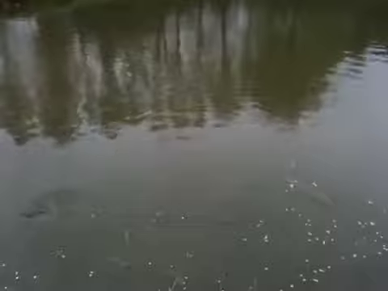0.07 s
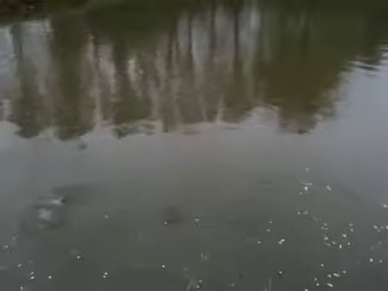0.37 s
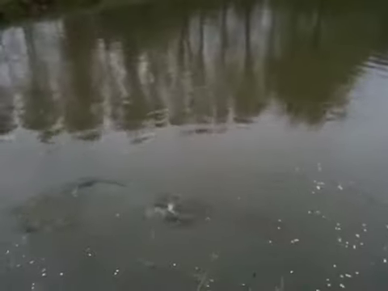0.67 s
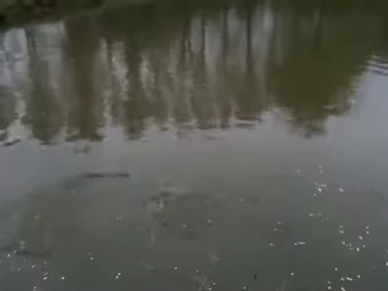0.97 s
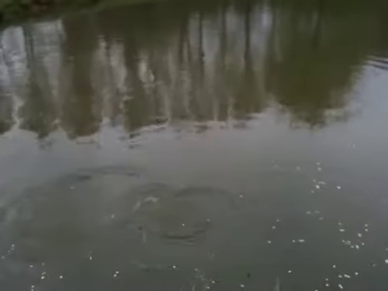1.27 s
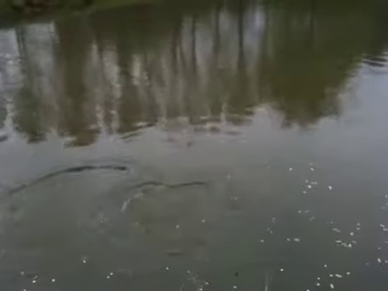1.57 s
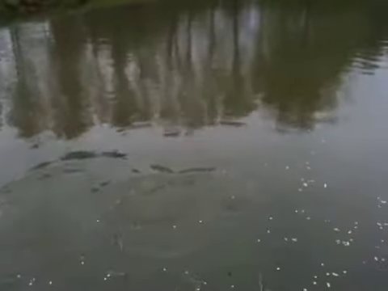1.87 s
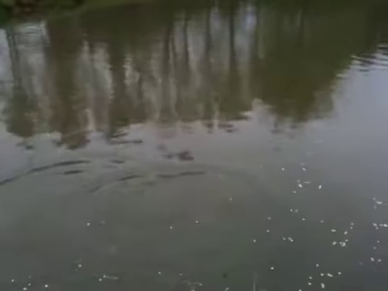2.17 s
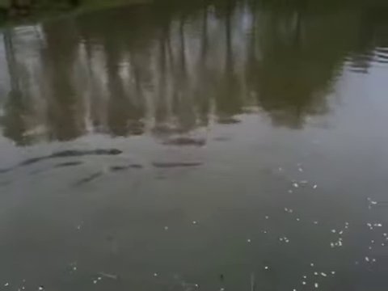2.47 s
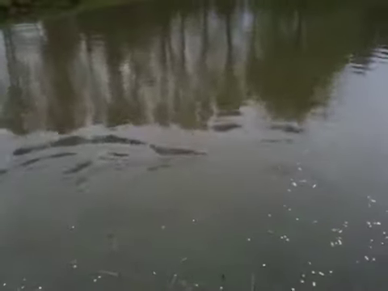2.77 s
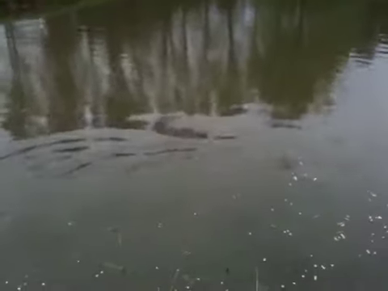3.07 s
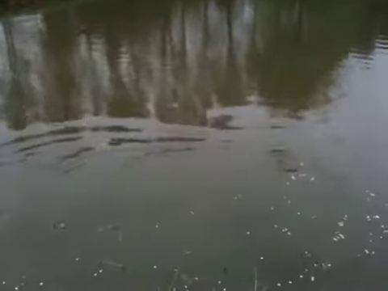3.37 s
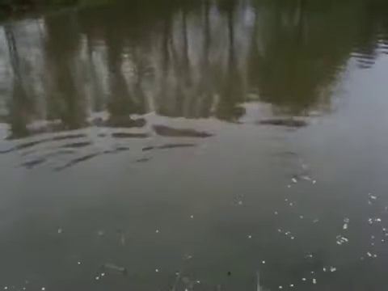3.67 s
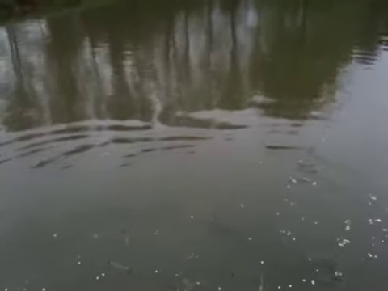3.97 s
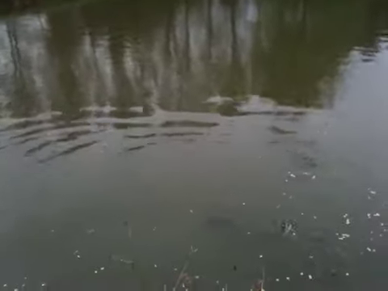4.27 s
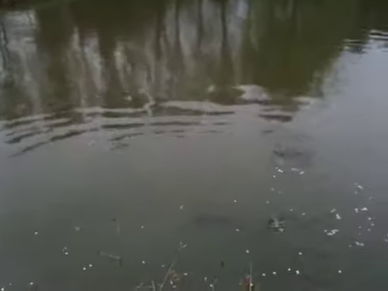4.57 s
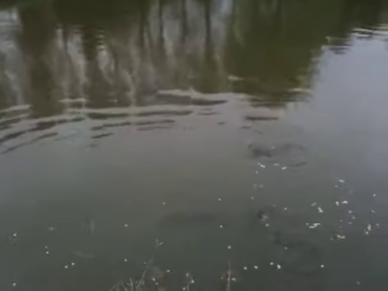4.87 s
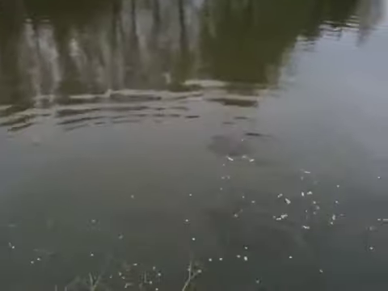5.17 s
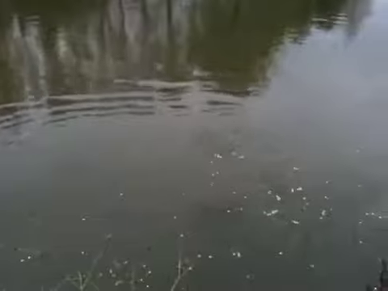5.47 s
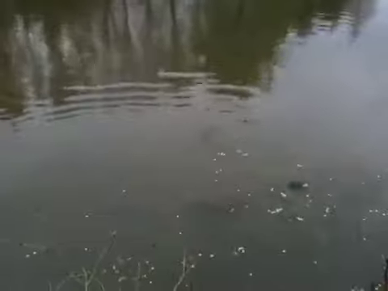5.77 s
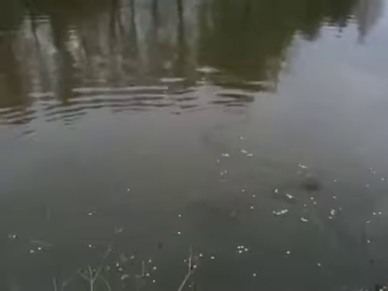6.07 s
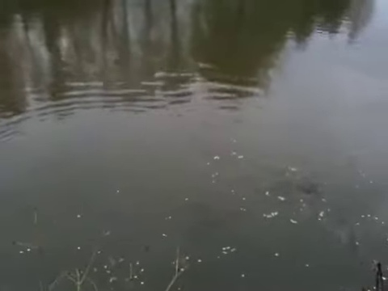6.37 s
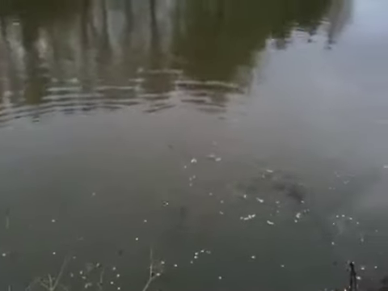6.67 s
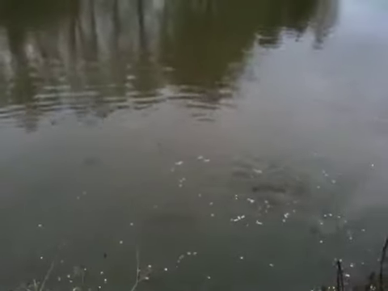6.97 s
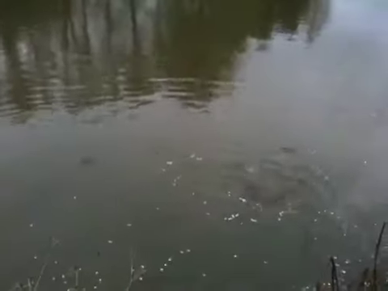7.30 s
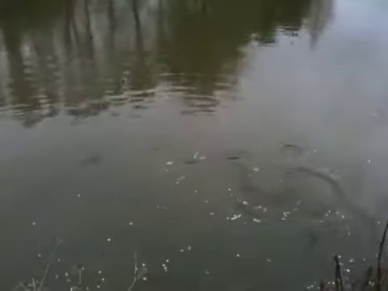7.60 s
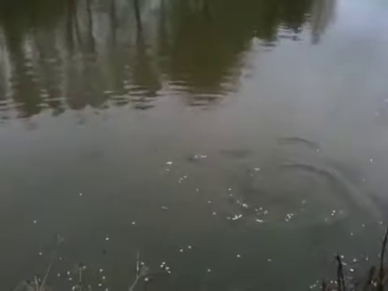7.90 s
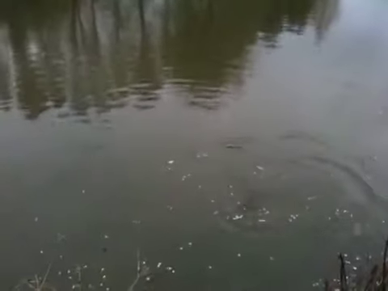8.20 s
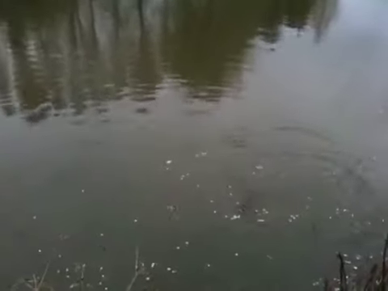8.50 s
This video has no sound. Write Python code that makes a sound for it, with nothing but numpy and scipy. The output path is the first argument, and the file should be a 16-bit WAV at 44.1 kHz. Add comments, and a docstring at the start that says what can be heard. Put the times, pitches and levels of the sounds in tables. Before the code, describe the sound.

Close by, fish break the surface of a pond with a few soft splashes and falling drops. At the same time, gusts of wind thump and rumble on the microphone, louder than anything else, then die down to a light breeze. Lone plips and ticks of water follow now and then. Across the pond, faint songbirds repeat short chirps and warbles over a quiet outdoor hush.

```python
"""Fish rising at a breezy pond

Close by, fish break the surface: soft splashes and falling drops, then lone plips and ticks.
Gusts thump right on the microphone and die down to a breeze.
Across the water songbirds repeat a few phrases, scattered by the trees, over a faint outdoor hush."""
import sys
import numpy as np
from scipy import signal
from scipy.fft import rfft, irfft, next_fast_len
from scipy.io import wavfile
from scipy.ndimage import uniform_filter1d

SR = 44100
rng = np.random.default_rng(int(sys.argv[2]) if len(sys.argv) > 2 else 0)


def int16_out(signal):
    """Quantize to a 16-bit WAV file."""
    q = np.round(np.clip(np.atleast_2d(signal).T, -1, 1) * 32767)
    wavfile.write(sys.argv[1], SR, q.astype(np.int16))


N = 376613
TIME = np.arange(N) / SR


# fish throwing up spray near the microphone: (time [s], relative level [dB], hold [s])
SPLASHES = [(0.18, -71, 0.19), (0.362, -67.5, 0.23), (0.665, -65.5, .02)]
# colour of droplets landing on water: (frequency [Hz], relative level [dB])
SPRAY_SPECTRUM = [(700, 8.5), (1200, 2), (2200, -5), (4000, -8.5), (7500, -12.5), (10000, -19.5),
                  (15000, -23.5)]

def spray(droplets_per_s=500, size_spread_db=4, attack_s=0.0048, fall_db_per_s=120, gain_db=9):
    """Fine droplets of uneven size patter back on the pond; each splash starts fast, holds and dies."""
    sizes = from_db(size_spread_db * np.minimum(rng.exponential(1, N), 4)) * rng.choice([-1, 1], N)
    landings = rng.random(N) < droplets_per_s / SR
    shower = np.zeros(N)
    for start, db, hold_s in SPLASHES:
        attack = np.clip((TIME - start) / attack_s, 0, 1)
        shower += attack * from_db(db - fall_db_per_s * np.clip(TIME - start - hold_s, 0, 1))
    return from_db(gain_db) * shower * coloured(sizes * landings, SPRAY_SPECTRUM)


# nearby drops and popping bubbles:
# (time [s], relative tick level [dB], relative bubble level [dB], bubble pitch [Hz])
DROPS = [(0.085, -43, -45, 1900), (0.2986, -33.5, -44, 3900), (0.38, -44, -33, 2360),
         (0.458, -48, -57, 5400), (0.491, -60, -35, 1210), (0.532, -47, -59, 4900), (0.569, -39, -37, 2400),
         (0.5755, -54, -42, 6140), (0.68, -48.5, -60, 5470), (1.103, -46, -41.5, 3480),
         (2.405, -55, -44, 3200), (2.7802, -41.5, -53, 3340), (5.038, -54, -47, 6400),
         (5.7758, -50, -36, 4430), (6.2873, -57, -35.5, 2080), (7.0963, -48, -61, 5300),
         (7.106, -42.5, -39.5, 960), (7.131, -55, -45, 1950), (7.187, -46, -52, 2300),
         (7.228, -55, -50, 6250), (7.248, -48, -46, 3620), (7.2804, -52, -53, 7500),
         (7.335, -46, -37, 1940), (8.119, -46.5, -49, 4780), (8.328, -50, -50, 7200)]

def plips(tick_t60=0.014, bubble_t60=0.013, tick_gain_db=-7.5, bubble_gain_db=-5.5, rise=0.055):
    """A drop ticks on the surface; the bubble it traps rings briefly and rises in pitch."""
    water, t = np.zeros(N), np.arange(SR // 10) / SR
    onset = 1 - np.exp(-t / 0.00017)
    for start, tick_db, bubble_db, bubble_hz in DROPS + faint_drops():
        tick_hz = 1.43 * bubble_hz  # small drops sound higher in both tick and bubble
        band_hz = [tick_hz / 1.64, min(tick_hz * 1.64, .45 * SR)]
        fizz = rms_one(butter(rng.standard_normal(len(t)), order=2, hz=band_hz, kind="band"))
        tick = from_db(tick_db + tick_gain_db - 60 * t / tick_t60) * fizz
        phase = 2 * np.pi * bubble_hz * np.cumsum(1 + rise * (t / bubble_t60 - .2)) / SR
        bubble = from_db(bubble_db + bubble_gain_db - 60 * t / bubble_t60) * np.sin(phase)
        add(water, start, (tick + bubble) * onset)
    return water


def faint_drops(per_s=1.2, low_hz=3500, high_hz=7500, relative_db=-63.5, spread_db=19):
    """Tiny bubbles burst at random all over the pond; rows like those of DROPS."""
    draws = rng.random((int(per_s * N / SR), 3))
    return [(when * N / SR, relative_db + spread_db * size, relative_db,
             low_hz * (high_hz / low_hz) ** pitch) for when, size, pitch in draws]


# light air on the microphone between gusts: (time [s], relative level [dB])
BREEZE = [(0, -44), (0.7, -37), (1.2, -40.5), (2.3, -44), (2.65, -51.5), (3.6, -50.5), (4.1, -50.5),
          (4.4, -63), (4.9, -61), (5.45, -52), (5.7, -62), (6.15, -84), (6.5, -69), (7.3, -63.5),
          (8.2, -55), (8.54, -60)]
# gusts swelling and fading on the microphone:
# (peak time [s], relative level [dB], half length [s], nominal roll-off [Hz])
GUSTS = [(0.181, -36.5, 0.023, 200), (0.264, -30.5, 0.0075, 320), (0.357, -30.5, 0.023, 240),
         (0.434, -25.5, .022, 315), (0.483, -27, 0.019, 272), (0.542, -26, 0.025, 276),
         (0.613, -20.5, 0.02, 440), (0.673, -31, 0.044, 220), (0.848, -26, 0.032, 274),
         (0.942, -32, 0.093, 223), (1.325, -34, 0.051, 146), (1.413, -28, 0.039, 192),
         (1.582, -35.5, 0.043, 163), (1.716, -32.5, 0.037, 184), (1.947, -34.5, 0.02, 149),
         (2.123, -40, .1, 132), (2.401, -35.5, 0.021, 166), (2.515, -42, 0.031, 137),
         (2.912, -44, 0.068, 129.6), (3.072, -42, 0.046, 112), (3.367, -40.5, 0.043, 116),
         (3.846, -37.5, 0.039, 105), (4.008, -39, 0.043, 127), (4.681, -47, 0.055, 133),
         (5.061, -42, 0.043, 106), (5.227, -43.5, 0.054, 151), (5.364, -47, .03, 135),
         (5.523, -38, 0.015, 119), (5.876, -43.5, 0.024, 112), (6.674, -49, 0.072, 96),
         (6.992, -50.5, 0.055, 130), (7.695, -44, 0.019, 123), (7.984, -43.5, .014, 109),
         (8.131, -46, 0.016, 103), (8.272, -49, 0.029, 104), (8.458, -33, 0.042, 137)]
# single eddies striking the microphone: (time [s], relative peak [dB], nominal roll-off [Hz])
THUMPS = [(0.196, -20, 260), (0.284, -20.5, 428), (0.336, -29, 402), (0.362, -20, 427), (0.407, -20.5, 257),
          (0.428, -18, 400), (0.544, -13, 356), (0.582, -21.5, 450), (0.601, -8.5, 540), (0.63, -15, 360),
          (0.669, -26.5, 425), (0.795, -22.5, 190), (0.857, -18, 292), (0.879, -25, 410), (0.967, -23, 230),
          (0.994, -28, 180), (1.05, -22.5, 258), (1.365, -20.5, 340), (1.42, -17, 192), (2.395, -26, 314),
          (2.568, -27, 142), (2.831, -30, 175), (3.725, -25.5, 131), (4.021, -26, 207), (5.194, -33, 145),
          (5.254, -30.5, 206), (5.448, -30.5, 202), (5.599, -30, 163), (6.76, -33.5, 107),
          (7.054, -38, 130), (8.444, -25, 204)]

def wind(breeze_nominal_hz=120.5, rolloff_scale=0.91, sputter=0.12, brightening=2.5, gain_db=3):
    """At the microphone a small eddy is one swing of pressure, a gust a lumpy swell of turbulence."""
    power = from_db(np.interp(TIME, *np.transpose(BREEZE))) ** 2
    weighted_hz = power * breeze_nominal_hz
    for peak_s, db, half_s, hz in GUSTS:
        gust = from_db(db) ** 2 * np.exp(-np.minimum(((TIME - peak_s) / half_s) ** 2, 20))
        power += gust
        weighted_hz += gust * hz
    thumps = np.zeros(N)
    for centre_s, db, hz in THUMPS:
        thump = eddy_thump(rolloff_scale * hz)
        add(thumps, centre_s - len(thump) / 2 / SR, from_db(db) * thump)
    strength = np.sqrt(power)
    rolloff_hz = rolloff_scale * weighted_hz / power  # the strongest gust sets the colour
    # the air speed sputters, and a hard gust breaks into finer eddies
    rolloff_hz *= np.exp(sputter * drift(per_s=160) + brightening * np.maximum(strength - .04, 0))
    pressure = thumps + strength * lumps() * turbulence(rolloff_hz)
    return from_db(gain_db) * butter(pressure, order=3, hz=132.4, kind="high")


def eddy_thump(rolloff_hz, size=4096):
    """One vortex crosses the microphone port: all pitches in step make a single thump of peak 1."""
    gain = eddy_spectrum(np.fft.rfftfreq(size, 1 / SR) + 1, rolloff_hz)
    phase = 2 * np.pi * rng.random()
    thump = np.roll(irfft(gain * np.exp(1j * phase)), size // 2)
    return thump / np.abs(thump).max()


def turbulence(rolloff_hz):
    """Many eddies make pressure noise of even strength under a moving roll-off."""
    edges_hz, size = np.geomspace(30, 3000, 21), next_fast_len(N)
    white, hz = rfft(rng.standard_normal(size)), np.fft.rfftfreq(size, 1 / SR)
    pressure = np.zeros(N)
    for low, high in zip(edges_hz, edges_hz[1:]):
        band = irfft(white * ((hz >= low) & (hz < high)), size)[:N]
        pressure += band * eddy_spectrum(np.sqrt(low * high), rolloff_hz)
    power = np.abs(signal.hilbert(pressure, size)[:N]) ** 2 / 2
    return pressure / running_rms(power, window_s=0.025)


def eddy_spectrum(hz, rolloff_hz, port_cut_hz=150.7, skirt_db=-24.5):
    """The microphone port passes little bass; above the roll-off only a skirt of tiny eddies remains."""
    ratio = hz / rolloff_hz
    body = np.exp(-ratio ** 1.453)
    skirt = from_db(skirt_db) * np.exp(-0.79 * ratio)
    return (body + skirt) / np.hypot(1, (port_cut_hz / hz) ** 2)


def lumps(depth_db=3.5):
    """The air arrives in quick lumps, which break a gust up without changing its overall strength."""
    gain = from_db(depth_db * drift(per_s=70))
    return gain / running_rms(gain ** 2, window_s=0.043)


# the birds' repertoire, the notes of each phrase: (delay [s], length [s], nominal first pitch [Hz],
# nominal middle pitch [Hz], nominal last pitch [Hz], relative level [dB], rasp [0-1])
PHRASES = { "cascade": [(0, .043, 3704, 5200, 3700, -1, .85), (.06, 0.0476, 3260, 3806, 3330, -1, .45),
           (.112, .045, 2730, 3170, 2930, -3.5, .3)], "warble": [(0, 0.0294, 3700, 3510, 3180, -8, 0.45),
           (.05, 0.0586, 2590, 2770, 2865, 0, 0.18), (.177, .02, 3750, 3450, 3400, -6, .15),
           (.212, 0.0488, 2423, 2043, 2050, -4, 0.4)], "dip": [(0, 0.0274, 2260, 2470, 2560, -6.5, 0.04),
           (.032, 0.042, 2100, 2030, 1950, -1.5, 0)], "slide": [(0, 0.068, 2095, 2394, 2506, 0, .4),
           (.063, .113, 2880, 2600, 1906, 0.5, 0.34)], "buzz": [(0, .097, 4700, 7600, 3000, 1, .85)],
           "sweep": [(0, .12, 5800, 6760, 7570, -3.5, 0.4)], "coo": [(0, 0.117, 1330, 1510, 1300, -1, .7)],
           "chip": [(0.0017, 0.0412, 2850, 3200, 3050, -0.5, .35)],
           "pipe": [(0, .032, 3080, 3204, 3120, -1.5, 0.48), (.034, .19, 3270, 3140, 3020, -7.5, 0.28)],
           "glide": [(0.0012, .041, 3360, 3200, 3080, -2.5, 0.33)],
           "tsip": [(0, .03, 7400, 2750, 2600, 7, 0.4)],
           "peep": [(0.0069, .037, 6000, 6050, 5300, 0, 0.44)]}
# calls from the trees across the water: (time [s], phrase [name], relative level [dB], pitch [ratio])
CALLS = [(0.869, "cascade", -63, 1.04), (1.625, "cascade", -72.5, 1.04), (1.99, "cascade", -72, 0.95),
         (2.449, "cascade", -68, 1.0), (3.973, "cascade", -62, 0.97), (4.408, "cascade", -68, 0.97),
         (4.967, "cascade", -69.5, 1.01), (6.07, "cascade", -69, 1.01), (6.602, "cascade", -66, 0.98),
         (7.712, "cascade", -66.5, 0.93), (8.164, "cascade", -73, 0.99), (3.16, "warble", -60.5, 1.02),
         (4.598, "warble", -58.5, 1.0), (7.253, "warble", -61, 0.98), (3.783, "dip", -56.5, 1.025),
         (7.92, "dip", -63, 1.02), (4.17, "slide", -70.5, 1.01), (5.728, "slide", -69, 1.0),
         (8.346, "slide", -66, 1), (3.63, "pipe", -68, 1), (8.24, "pipe", -64.5, 0.97),
         (1.593, "buzz", -73.5, 1.06), (1.82, "buzz", -71, 1.06), (3.035, "peep", -69.5, 1.19),
         (3.12, "sweep", -71, 0.96), (5.95, "coo", -66.5, 0.97), (6.56, "coo", -72, 0.98),
         (1.63, "chip", -67, 1.15), (1.84, "chip", -67, 1.24), (5.094, "chip", -63.5, 1),
         (5.25, "chip", -66, .77), (5.635, "chip", -60, 0.99), (6.785, "chip", -68.5, .94),
         (7.841, "chip", -68, 1.01), (0.02, "glide", -67.5, 0.73), (0.132, "glide", -69, 1.28),
         (0.212, "glide", -68, 1.07), (0.247, "glide", -67, 1.4), (0.445, "glide", -66, 1),
         (5.977, "glide", -70.5, 1.07), (7.121, "glide", -68, 1.0), (0.465, "tsip", -69, 1.65),
         (2.818, "tsip", -80.5, 1.6), (3.699, "tsip", -79, 0.78), (5.172, "tsip", -77, .94),
         (2.905, "peep", -73, 0.96), (3.41, "peep", -73, .92), (3.49, "glide", -69.5, 1.47),
         (4.8, "peep", -70, 0.79), (5.519, "peep", -62, 0.95), (5.61, "glide", -70.5, 1.47),
         (6.755, "peep", -72, 0.91), (7.19, "peep", -66, .73)]

def songbirds(vary_pitch=0.00776, vary_db=2.5):
    """The nearer singers repeat a few phrases; no note comes out quite the same twice."""
    song = np.zeros(N)
    for start, phrase, call_db, ratio in CALLS:
        for delay, length_s, *pitches_hz, note_db, rasp in PHRASES[phrase]:
            sung_hz = ratio * np.array(pitches_hz) * (1 + vary_pitch * rng.standard_normal(3))
            gain = from_db(call_db + note_db + vary_db * rng.standard_normal())
            add(song, start + delay, gain * whistle(length_s, sung_hz, rasp))
    return song


def whistle(length_s, pitches_hz, rasp, shakes_per_s=650, fade_share=0.1):
    """A bird note arches through three pitches; rasp shakes its pitch and loudness."""
    progress = np.linspace(0, 1, int(length_s * SR))
    shake, flutter = (np.interp(progress * length_s * shakes_per_s, np.arange(400), knots)
                      for knots in rng.standard_normal((2, 400)))
    rasp = np.clip(rasp, .1, 1)
    curved_hz = np.polyval(np.polyfit([0, .5, 1], pitches_hz, 2), progress)
    straight_hz = np.interp(progress, [0, .5, 1], pitches_hz)
    hz = (curved_hz + straight_hz) / 2 * (1 + .06 * rasp * shake)
    fade = np.clip(np.minimum(progress, 1 - progress) / fade_share, 0, 1)
    swell = np.sin(np.pi / 2 * fade) * from_db((1.5 + 3.5 * rasp) * flutter)
    return rms_one(swell * np.sin(2 * np.pi * np.cumsum(hz) / SR))


def distant_chorus(count=170, low_hz=2106, high_hz=5500, level_db=-74, spread_db=3):
    """Birds deeper in the wood twitter at random, higher notes fainter, livelier as time goes on."""
    song = np.zeros(N)
    notes, variations = rng.random((count, 3)), rng.standard_normal((count, 4))
    for (when, pitch, length), (loudness, *bends) in zip(notes, variations):
        pitches_hz = low_hz * (high_hz / low_hz) ** pitch * (1 + 0.1 * np.array(bends))
        note = whistle(0.042 + .04 * length, pitches_hz, rasp=0.28)
        add(song, when ** .75 * N / SR, from_db(level_db + spread_db * loudness - 3 * pitch) * note)
    return song


# colour of the echo off the wooded banks: (frequency [Hz], relative level [dB])
ECHO_SPECTRUM = [(1000, -20), (2500, 4.5), (4000, -1.5), (8000, 9)]

def woodland_echo(sound, t60, delay_s, echoes_per_s=830):
    """Trunks and banks scatter a thin, dying cloud of echoes back to the microphone."""
    t = np.arange(SR) / SR
    echoes = rng.standard_normal(SR) * (rng.random(SR) < echoes_per_s / SR)
    decay = from_db(-60 * t / t60) * (t > delay_s)
    response = coloured(echoes * decay, ECHO_SPECTRUM) / np.sqrt(SR)
    return signal.fftconvolve(sound, response)[:N]


# ambience around the pond: (frequency [Hz], relative level [dB])
HUSH_SPECTRUM = [(30, -17), (80, 1.5), (160, 7.5), (300, -2), (600, -2), (1000, -5.5), (1700, -9.5),
                 (2800, -12.5), (5000, -17), (8500, -22.5), (11500, -24), (13000, -27.5), (15700, -27)]

def hush(level_db=-61.5, waver_db=0.24):
    """Air in the far trees makes a faint, barely wavering noise."""
    gain = from_db(level_db - waver_db * drift(per_s=6.7))
    return gain * coloured(rng.standard_normal(N), HUSH_SPECTRUM)


def from_db(db):
    return 10 ** (np.asarray(db) / 20)


def rms_one(x):
    return x / np.sqrt(np.mean(x ** 2) + 1e-20)


def running_rms(power, window_s):
    """Root of the power, smoothed twice."""
    size = int(window_s * SR)
    return np.sqrt(np.abs(uniform_filter1d(uniform_filter1d(power, size), size)) + 1e-20)


def add(track, start_s, sound):
    """Mix a short sound into the track."""
    i = int(np.clip(start_s * SR, 0, N - 1))
    track[i:i + len(sound)] += sound[:N - i]


def coloured(x, spectrum):
    """Give a sound a spectrum; rms 1."""
    hz, db = np.transpose(spectrum)
    size = next_fast_len(len(x))
    grid_hz = np.fft.rfftfreq(size, 1 / SR) + 1
    gain = from_db(np.interp(np.log(grid_hz), np.log(hz), db))
    return rms_one(irfft(rfft(x, size) * gain, size)[:len(x)])


def drift(per_s):
    """A random wander; rms 1."""
    knots = rng.standard_normal(2000)
    return rms_one(np.interp(TIME * per_s, np.arange(len(knots)), knots))


def butter(x, order, hz, kind):
    """Causal Butterworth filter."""
    return signal.sosfilt(signal.butter(order, hz, kind, fs=SR, output="sos"), x)


def scene():
    """One microphone at the pond: water close by, wind right on it, birds off in the trees."""
    song = songbirds()
    water = plips() + spray()
    # twigs scatter the high notes most, so little of them comes straight across
    direct_song = from_db(1.5) * butter(song, order=2, hz=6100, kind="low")
    branches = woodland_echo(from_db(-1) * song + distant_chorus(), t60=0.08, delay_s=.001)
    far_bank = woodland_echo(from_db(-0.5) * song + from_db(-26) * water, t60=0.73, delay_s=0.022)
    return (water + wind() + direct_song + branches + far_bank + hush())[None]


def record(dry, overload=0.53, cutoff_hz=15730):
    """The strongest gust overloads the microphone a little; the top is cut steeply."""
    rounded = overload * np.tanh(dry / overload)
    return signal.sosfilt(signal.ellip(12, .2, 70, cutoff_hz, fs=SR, output="sos"), rounded)


dry = scene()
out = record(dry)
int16_out(out)
```